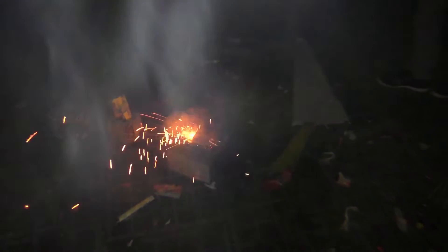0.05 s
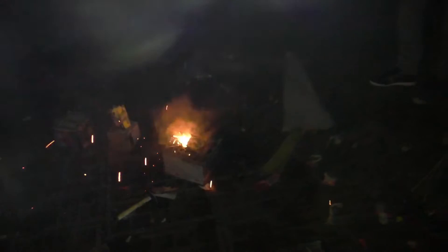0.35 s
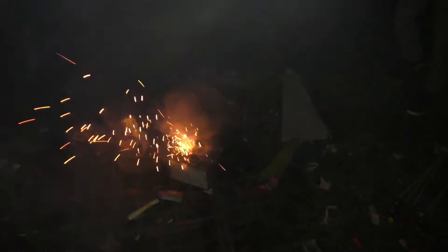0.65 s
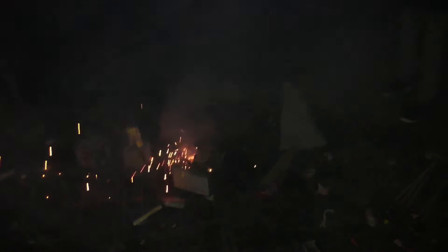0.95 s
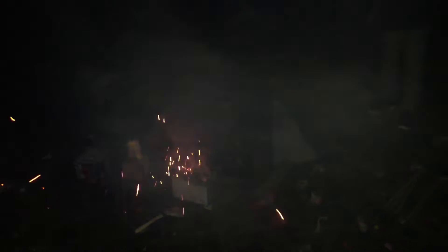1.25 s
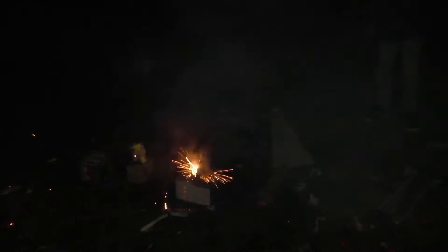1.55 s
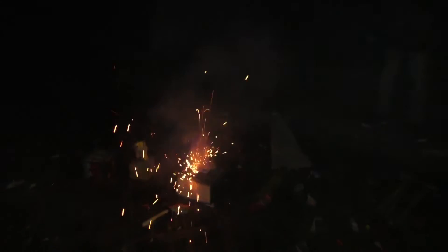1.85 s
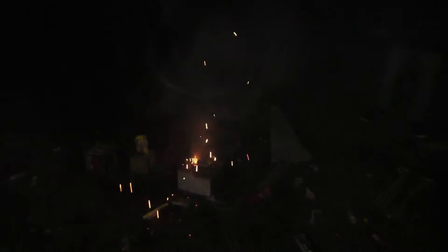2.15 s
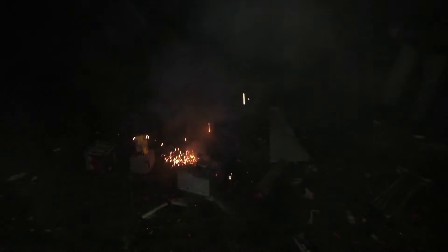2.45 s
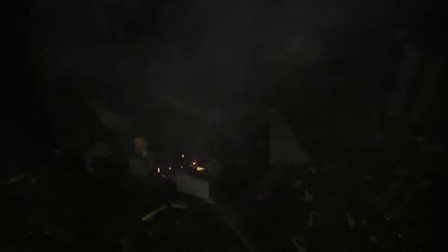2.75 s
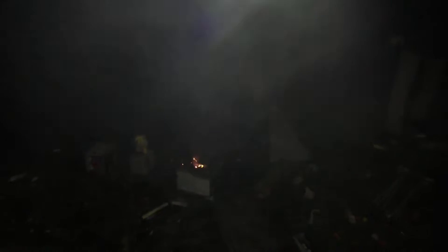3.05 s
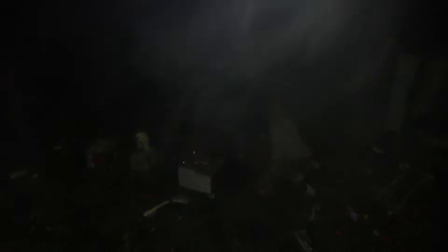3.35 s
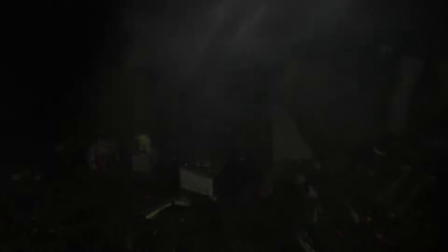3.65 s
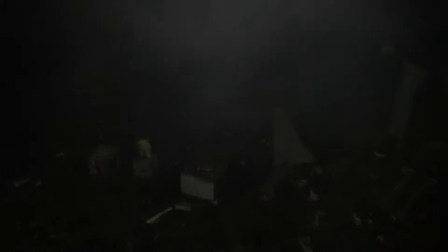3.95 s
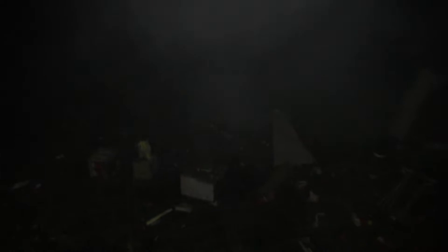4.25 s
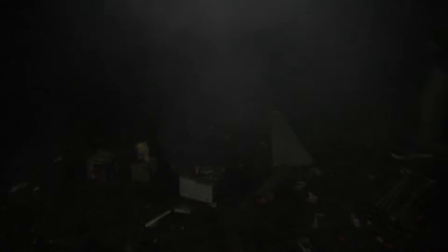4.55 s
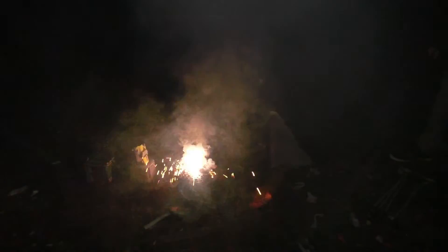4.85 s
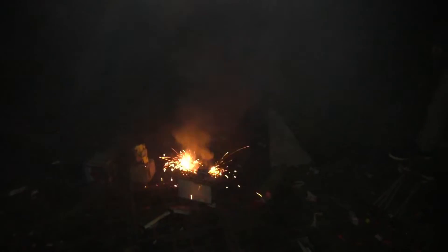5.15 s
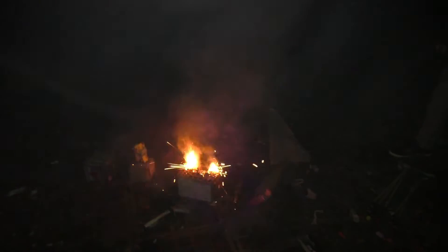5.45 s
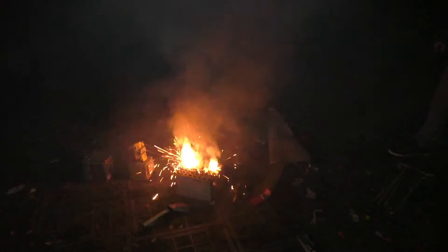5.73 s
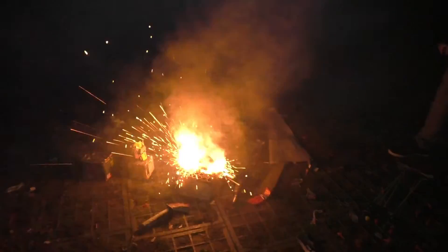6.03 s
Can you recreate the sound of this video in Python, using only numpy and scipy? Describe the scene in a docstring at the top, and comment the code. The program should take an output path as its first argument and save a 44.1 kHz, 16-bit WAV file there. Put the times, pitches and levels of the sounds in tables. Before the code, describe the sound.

Sharp, dry cracks from small firecrackers burst irregularly a few metres away, ringing briefly around a walled yard. A soft, breathy fizz slips in before two further bangs. Then comes a lull of about two seconds, holding only a low far-off rumble and the quiet sputter of a fuse. A sudden bang ends it and sets off rapid crackling, with loud reports among many weaker pops.

```python
"""Sharp single bangs from a string of small firecrackers, on the ground a few metres from the microphone,
in a yard at night. One vents with a fizz; the fuse creeps on through a pause, then comes a dense volley.
Each bang is a shock front with a faint noisy tail, a ring of paper tube and carton, and a thump of air;
it comes back from the walls. The recorder ducks at the bangs and, in the pause, slowly turns up
the distant rumble and the hiss of the fuse."""
import sys
import numpy as np
from scipy import signal
from scipy.fft import rfft, irfft, next_fast_len
from scipy.io import wavfile
from scipy.ndimage import uniform_filter1d, minimum_filter1d

SR = 44100
rng = np.random.default_rng(int(sys.argv[2]) if len(sys.argv) > 2 else 0)


def log_audio(samples):
    """Write samples as a 16-bit WAV file to the path given in sys.argv[1]."""
    # one column per channel
    frames = np.atleast_2d(samples).T
    # limit to full scale, then quantise
    limited = np.clip(frames, -1, 1)
    pcm = np.round(limited * 32767).astype(np.int16)
    wavfile.write(sys.argv[1], SR, pcm)


N = 272979
TIME = np.arange(N) / SR
BANG_SAMPLES = 4096

# colour of the distant night rumble [f/Hz, level/dB]
RUMBLE_COLOUR = [(15, -33), (25, -19), (66, -0.5), (161, -0.5), (263, -6), (416, -8), (818, -17),
                 (1130, -13.5), (2550, -28.5), (3520, -28), (7110, -41.5), (11500, -35.5), (16000, -51)]
# the rumble at the microphone, before gain control [t/s, level/dB]
RUMBLE_LEVEL = [(0, -65.5), (2.7, -73), (3.4, -75), (3.8, -74), (4.6, -72.5)]
# colour of the fuse's hiss [f/Hz, level/dB]
FUSE_COLOUR = [(80, -28.5), (400, -2), (750, -9), (1200, 3.5), (2200, -4.5), (3000, -3), (3500, -1),
               (4000, -11), (5500, -9.5), (6400, -12.5), (9000, -15), (15500, -16)]
# steady hiss of the burning fuse [t/s, level/dB]
FUSE_LEVEL = [(0, -84), (.9, -65), (1.3, -71.5), (2.1, -89), (2.75, -80), (3.3, -91), (4.1, -92),
              (4.4, -85), (4.62, -77), (5, -70), (6.19, -82)]
# flares of sparks on top of that hiss, the last one joining the cracker that fizzes out [t/s, level/dB,
# fade/(dB/s)]
FUSE_FLARES = [(0, -47.5, 131), (0.278, -46.5, 72), (1.85, -54.5, 260)]
# colour of a cracker that fizzes out [f/Hz, level/dB]
FIZZ_COLOUR = [(100, -28), (800, -5), (1500, -39), (3600, -3), (4400, -20.5), (5100, 15.5), (6500, 15.5),
               (7900, 17), (9000, -12), (10200, 4), (15500, -29)]
# the breathy whistle of its tube [f/Hz, width/Hz, level/dB, decay/s]
FIZZ_WHISTLE = (2580, 300, -59, .12)
# colour of the yard's echo [f/Hz, level/dB]
YARD_COLOUR = [(60, -4.5), (400, -5.5), (750, -21.5), (1300, 0), (2400, -1), (3700, 4), (5500, 0),
               (9000, 0), (13000, -5.5), (15500, -11.5)]
# how long the yard rings [f/Hz, t60/s]
YARD_DECAY = [(100, .7), (1500, 0.4), (5000, 0.49), (10000, 0.4), (16000, 0.58)]
# stretches where weak pops go off at random [from t/s, to t/s, count]
POP_SPELLS = [(1.07, 1.16, 5), (4.78, 5.45, 10), (5.45, 6.19, 16)]
# the carton's ring climbs as the fire heats the air in it [t/s, f/Hz, level/dB relative to the crack]
CARTON_RING = [(0, 3620, -19.5), (2.4, 3484, -28), (4.64, 3460, -1), (5, 3925, -8), (5.8, 4320, -7),
               (5.95, 4650, -8), (6.19, 4400, -12)]
# colour of a thump [f/Hz, level/dB]
THUMP_COLOUR = [(60, 6.5), (250, 6), (480, 8), (700, 8), (1200, -8), (4000, -15)]
# colour of a crack [f/Hz, level/dB]
CRACK_COLOUR = [(300, -22), (740, -20), (1100, -4), (2200, .5), (3050, -5), (3550, -1), (4300, -8.5),
                (4900, -3.5), (5550, -16), (6500, -9), (7400, -8), (9400, -7), (11500, -9), (13500, -13.5),
                (16000, -17)]
# crackers that stand out, levels over 1 ms [t/s, crack level/dB, tilt/(dB/octave), thump level/dB]
BANGS = [(.0736, 8.5, -3.5, -4), (.116, 5.5, -4, -34), (.28, -2.5, 2, -20), (0.3041, -11, 0, -30),
         (.33, 10, -2.5, 2.5), (.413, 5.5, -2, -11.5), (.4719, 8.5, -2.5, 9), (0.5884, 10.5, 0.5, -3),
         (0.72, 11.5, 0, 6.5), (0.76, -3, 6.5, -23.5), (0.9706, -44, -1.5, -51), (1.0337, 7, -3, 0.5),
         (1.0609, 1, -4.5, -18.5), (1.106, -18, 0, -40), (1.1175, -18.5, -2, -38), (1.186, 2.5, -2, -10),
         (1.3092, 6.5, -5, -23), (1.3901, -3, -1.5, -22), (1.428, -0.5, -0.5, -21.5),
         (1.5317, -4, 0.5, -19.5), (1.5701, 3.5, 1, 1.5), (1.6973, -1, 1.5, -20), (1.7638, 4.5, 4.5, -15.5),
         (1.8058, 7.5, -5.5, -3.5), (2.2561, 9, 3, -5.5), (2.293, -19, -1.5, -39.5), (2.3782, 8.5, -2.5, 0),
         (2.3869, -5.5, -2, -18), (4.637, 7.5, 1, -1), (4.714, -11, 1.5, -28), (4.776, -7.5, -1, -18.5),
         (4.8081, 12, 1.5, 4.5), (4.8352, -18, -5.5, -31), (4.874, 3, -2, -9), (4.909, -12, -3, -28),
         (4.952, -16, -2.5, -45), (4.9869, -3, 0.5, -19), (5.0177, 1.5, 0, -12), (5.0634, -6.5, 1, -19.5),
         (5.1155, -4, 0, -25.5), (5.1667, -2, 0, -18), (5.2586, 4.5, -3.5, -2), (5.2667, 1, 4, -7.5),
         (5.3309, -2.5, 3, -23.5), (5.3753, -10.5, -.5, -36), (5.399, -13.5, 0.5, -54),
         (5.416, 8.5, 0.5, 2), (5.4315, -13, 1, -37), (5.467, -9, -2.5, -29), (5.5052, -16.5, 0, -43),
         (5.5211, -19, -1.5, -38), (5.524, -16.5, -2, -45), (5.5535, -2, 0, -27), (5.5624, -20, -1.5, -23),
         (5.6004, -17, -3, -59), (5.6267, -6.5, 0.5, -18), (5.6388, -11, 2, -30), (5.651, -10, -2, -32),
         (5.661, -10, 0, -34), (5.6801, -8.5, 3, -41), (5.7225, -10.5, -1, -35), (5.7874, -19, -1, -40),
         (5.84, 9, 3, -2), (5.8598, -6, 0, -29), (5.8966, -17.5, -4, -50), (5.8993, -10.5, -1.5, -27),
         (5.9227, -8.5, 1, -26.5), (5.9462, -4, -1, -17.5), (5.9834, -7, -1.5, -20.5),
         (6.0024, -16.5, 2, -45), (6.0452, -4.5, -1, -22), (6.0521, -6, -1.5, -21.5),
         (6.062, -16, -2.5, -33), (6.0676, -6.5, 0, -27), (6.0851, -18, 2, -42), (6.1052, -8.5, 0, -26.5),
         (6.1448, -1.5, 1, -6.5), (6.1481, -4, 2.5, -18.5), (6.186, -11.5, -0.5, -30)]

VOLLEY_S = 4.6  # the fire reaches the bundle in the carton


def undb(db):
    """Decibels to gain."""
    return 10 ** (np.asarray(db) / 20)


def on_log_axis(points, hz):
    """Read [f/Hz, value] points along a log-frequency axis."""
    at, value = np.transpose(points)
    return np.interp(np.log(np.maximum(hz, 1)), np.log(at), value)


def colour(x, points, tilt_db=0., pivot_hz=3500):
    """Causal filter through [f/Hz, level/dB] points, tilted by tilt_db an octave above 500 Hz."""
    size = x.shape[-1]
    fft_size = 2 * next_fast_len(size)
    hz = np.arange(fft_size // 2 + 1) * SR / fft_size
    db = on_log_axis(points, hz) + tilt_db * np.log2(np.maximum(hz, 500) / pivot_hz)
    cepstrum = irfft(db * np.log(10) / 20)
    cepstrum[1:fft_size // 2] *= 2  # minimum phase: nothing sounds ahead of a shock
    cepstrum[fft_size // 2 + 1:] = 0
    return irfft(rfft(x, fft_size) * np.exp(rfft(cepstrum)))[..., :size]


def stereo_noise(size, side):
    """Noise common to both channels plus an opposed share."""
    mid, apart = rng.standard_normal((2, size))
    return np.array([mid + side * apart, mid - side * apart])


def level(x, db):
    """Set the rms level."""
    return x * undb(db) / np.sqrt(np.mean(x ** 2))


def burst_level(x, db):
    """Give a burst the energy of one millisecond at this level."""
    return level(x, db) * np.sqrt(SR / 1000 / x.shape[-1])


def drift(rate_hz):
    """Random wavering with a spread near 1."""
    hold = int(SR / rate_hz)
    steps = np.repeat(rng.standard_normal(N // hold + 1), hold)[:N]
    return uniform_filter1d(steps, hold)


def add(track, s, sound):
    """Mix a sound into a track at time s."""
    start = max(int(s * SR), 0)
    part = track[:, start:start + sound.shape[-1]]
    part += sound[:, :part.shape[-1]]


def rumble():
    """Far off: the low noise of the night, its level moving slowly."""
    night = level(colour(stereo_noise(N, side=0.57), RUMBLE_COLOUR), 0)
    return night * undb(np.interp(TIME, *np.transpose(RUMBLE_LEVEL)))


def fuse(flutter_db=-5.5, spit_db=3.0, rise_db_per_s=601):
    """A few metres off, burning powder hisses and sputters; now and then it flares up and fades."""
    burn = undb(np.interp(TIME, *np.transpose(FUSE_LEVEL)))
    for s, db, fade_db_per_s in FUSE_FLARES:
        below_peak_db = np.maximum(rise_db_per_s * (s - TIME), fade_db_per_s * (TIME - s))
        burn = burn + undb(db - below_peak_db)
    flutter = undb(flutter_db * drift(28))
    gas = stereo_noise(N, side=1.0) * undb(spit_db * drift(470))
    return level(colour(gas, FUSE_COLOUR), 0) * burn * flutter


def fizzle(start_s=1.838, rise_s=0.0042, hiss_db=-49, hiss_s=0.059):
    """One cracker vents instead of bursting: a jet of sparks dies away with a breathy whistle."""
    t = np.arange(SR) / SR
    hz, width_hz, whistle_db, whistle_s = FIZZ_WHISTLE
    jet = level(colour(stereo_noise(SR, side=0.17), FIZZ_COLOUR), hiss_db) * np.exp(-t / hiss_s)
    tube = signal.lfilter(*signal.iirpeak(hz, hz / width_hz, fs=SR), stereo_noise(SR, side=0.63))
    whistle = level(tube, whistle_db) * np.exp(-t / whistle_s)
    out = np.zeros((2, N))
    add(out, start_s, np.tanh(t / rise_s) * (jet + whistle))
    return out


def yard(sent, first_s=.033, rise_s=0.0011, early=0.22, wall=0.99, wall_s=0.025, far_db=-27, far_s=0.077):
    """Diffuse echo round the microphone, swelling when the nearest wall answers; the bass rings longest."""
    t = np.arange(SR) / SR
    hz = np.arange(SR // 2 + 1)
    band_hz, band_t60 = np.transpose(YARD_DECAY)
    spectrum = rfft(stereo_noise(SR, side=0.24))
    tail = 0
    for t60, share in zip(band_t60, np.eye(len(band_hz))):
        band = on_log_axis(np.c_[band_hz, share], hz)
        tail = tail + irfft(spectrum * band, SR) * np.exp(-np.log(1000) * t / t60)
    tail = tail + undb(far_db) * irfft(spectrum, SR) * np.exp(-t / far_s)  # answer from farther off
    arrived = (1 + np.tanh((t - first_s) / rise_s)) / 2
    shape = early + arrived * (1 + wall * np.exp(-np.abs(t - first_s) / wall_s))
    response = burst_level(colour(tail * shape, YARD_COLOUR), 6.0)
    return signal.fftconvolve(sent, response, axes=-1)[:, :N]


def weak_pops(mean_db=-25.5, spread_db=1, thump_under_db=22):
    """Feeble crackers go off at random among the bangs; rows as in BANGS."""
    when = np.concatenate([rng.uniform(start, end, count) for start, end, count in POP_SPELLS])
    crack_db = mean_db - spread_db * rng.standard_normal(len(when))
    return [(s, db, 0, db - thump_under_db) for s, db in zip(when, crack_db)]


def ring(hz, rattle, decay_s=0.0018, channel_spread_rad=0.51):
    """Struck by the burst, paper rings roughly for a few milliseconds."""
    t = np.arange(BANG_SAMPLES) / SR
    roughness = rattle * np.cumsum(rng.standard_normal(BANG_SAMPLES))
    phase = roughness + channel_spread_rad * rng.standard_normal((2, 1))
    return np.exp(-t / decay_s) * np.sin(2 * np.pi * hz * t + phase)


def tube_and_carton(s, tube_hz=1790, spread_octaves=.18, tube_db=-12, lowest_hz=1000):
    """Each tube rings at its own pitch, and the carton with it; both are too small to radiate bass."""
    at, carton_hz, carton_db = np.transpose(CARTON_RING)
    own_hz = tube_hz * 2 ** (spread_octaves * rng.standard_normal())
    tube = burst_level(ring(own_hz, rattle=0.22), tube_db)
    carton = burst_level(ring(np.interp(s, at, carton_hz), rattle=0.13), np.interp(s, at, carton_db))
    return signal.sosfilt(signal.butter(4, lowest_hz, "high", fs=SR, output="sos"), tube + carton)


def thump_pitch(s, thump_db, light_hz=370, heavy_db=5, deepen_db_per_s=13.5):
    """A bigger blast swings more slowly, the more so as the fireball grows in the volley."""
    knee_db = heavy_db - deepen_db_per_s * max(s - VOLLEY_S, 0)
    return light_hz / np.hypot(1, undb(thump_db - knee_db))


def thump(hz, tilt_db, damping=0.46, swell=0.014, swell_hz=28, swell_s=0.015, grit=0.98, leftward=0.72):
    """The blast's push and suck at the microphone: one damped swing and a slow settling of the air."""
    t = np.arange(BANG_SAMPLES) / SR
    phase = 2 * np.pi * hz * t
    # the gust presses harder on one microphone port than on the other
    ports = np.sign(rng.standard_normal() + leftward) * np.array([[.65], [-.65]])
    lean = ports * np.cos(phase / 2) * np.tanh(phase)
    roughness = grit * stereo_noise(BANG_SAMPLES, side=0.47)
    swing = np.exp(-damping * phase) * (np.sin(phase) + lean + roughness)
    settle = swell * np.exp(-t / swell_s) * np.sin(2 * np.pi * swell_hz * t)
    return colour(swing - settle, THUMP_COLOUR, tilt_db)


def crack(tilt_db, gas=0.57, gas_s=0.00053, tail=0.07, tail_s=0.0035, bounce=0.043):
    """A shock front, its bounce off the ground, a spit of gas and a faint noisy tail of a few ms."""
    t = np.arange(BANG_SAMPLES) / SR
    spit = gas * np.exp(-t / gas_s) * stereo_noise(BANG_SAMPLES, side=.15)
    noisy_tail = tail * np.exp(-t / tail_s) * stereo_noise(BANG_SAMPLES, side=.5)
    pressure = spit + noisy_tail
    pressure[:, 0] += 1  # the shock front
    bounce_s = rng.uniform(.00025, .0007)
    pressure[:, int(SR * bounce_s)] += bounce
    return colour(pressure, CRACK_COLOUR, tilt_db)


def outward_blast(samples=96, decay_samples=22):
    """Each cracker bursts in its own direction, so the pulse that reaches the walls has its own colour."""
    blast = rng.standard_normal((1, samples)) * np.exp(-np.arange(samples) / decay_samples)
    blast[:, 0] += 7  # the shock front
    return blast / np.linalg.norm(blast)


def firecrackers(dulling=0.19, send_db=-44.5, send_growth=.7, volley_extra_db=7, left_db=0.05):
    """On the ground a few metres off, every cracker cracks, rings, thumps and sets off the yard."""
    direct, sent = np.zeros((2, N)), np.zeros((1, N))
    for s, crack_db, tilt_db, thump_db in BANGS + weak_pops():
        add(direct, s, burst_level(crack(tilt_db), crack_db))
        add(direct, s, undb(crack_db) * tube_and_carton(s))
        thump_tilt_db = dulling * min(thump_db, 0)  # a feeble blast pushes softly and loses treble
        push = thump(thump_pitch(s, thump_db), thump_tilt_db)
        add(direct, s, burst_level(push, thump_db))
        to_yard_db = send_db + send_growth * crack_db + volley_extra_db * (s > VOLLEY_S)
        add(sent, s, undb(to_yard_db) * outward_blast())
    return direct * undb([[left_db], [-left_db]]) + yard(sent)


def scene():
    """What reaches the microphone: firecrackers, their fuse and the night around them."""
    return firecrackers() + fizzle() + fuse() + rumble()


def peak_hold(x, hold_s, ahead_samples=48):
    """Highest level in dB over about the last hold_s seconds, looking a moment ahead."""
    size = int(hold_s * SR) + 64
    db = 20 * np.log10(np.abs(x).max(axis=0) + 1e-9)
    return -minimum_filter1d(-db, size, origin=size // 2 - ahead_samples)


def record(dry, target_db=-18, max_boost_db=24, recover_db_per_s=20.5,
           knee_db=-24, squeeze=0.34, ceiling=.85, top_hz=15700):
    """The recorder: slow gain control, a fast compressor, an overloading input and a top cut."""
    peak_db = peak_hold(dry, hold_s=.028)
    wanted_db = np.clip(target_db - peak_db, 0, max_boost_db)
    wanted_db[0] = 0  # the gain starts turned down
    # the gain drops at once and creeps back at a steady rate
    creep_db = recover_db_per_s * TIME
    slow_db = np.minimum.accumulate(wanted_db - creep_db) + creep_db
    duck_db = squeeze * np.maximum(peak_db - knee_db, 0)
    overloaded = ceiling * np.tanh(dry * undb(slow_db - duck_db) / ceiling)
    return signal.sosfilt(signal.ellip(8, .2, 70, top_hz, fs=SR, output="sos"), overloaded)


dry = scene()
out = record(dry)
log_audio(out)
```